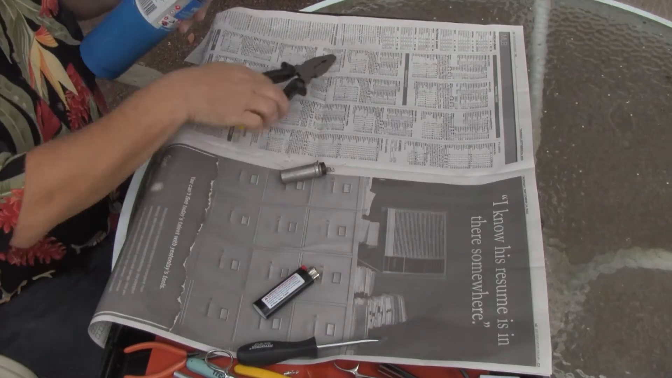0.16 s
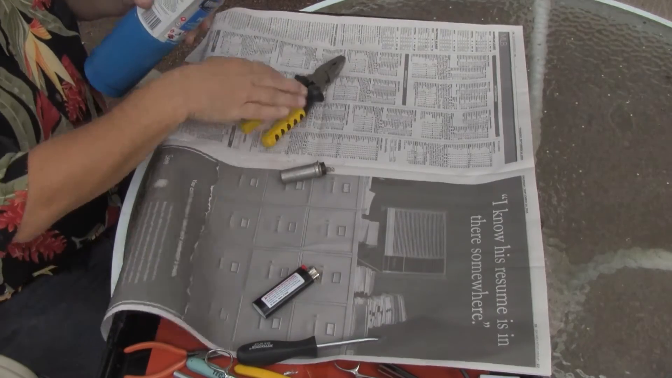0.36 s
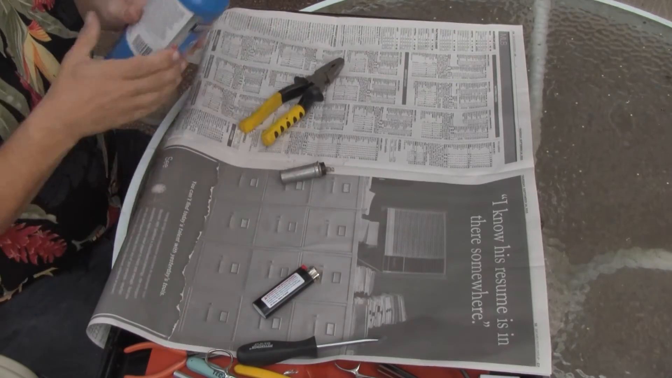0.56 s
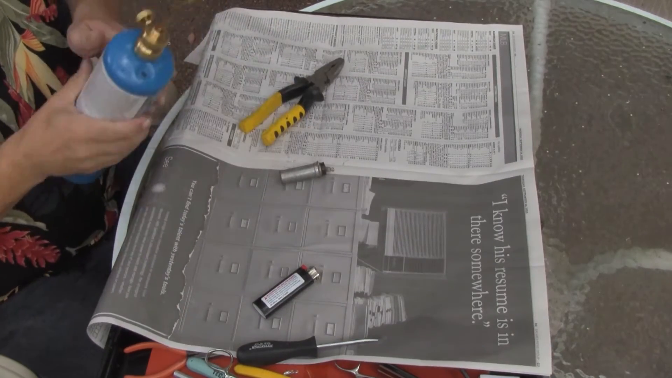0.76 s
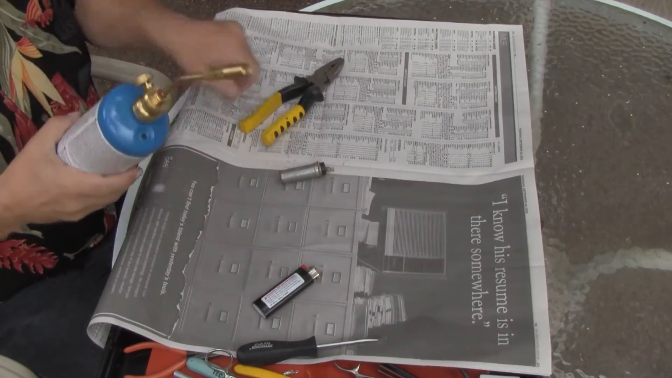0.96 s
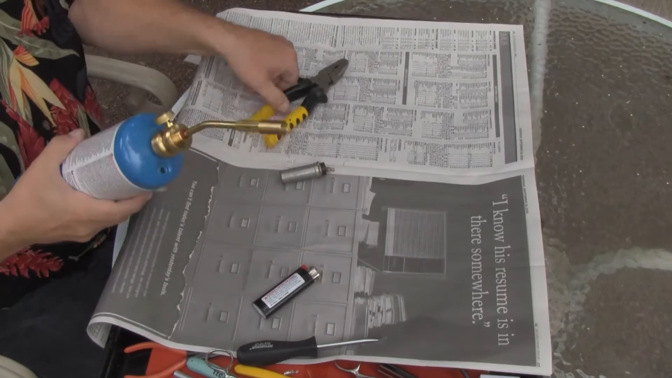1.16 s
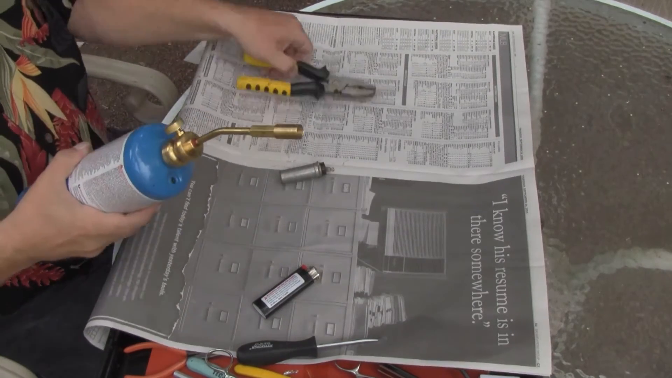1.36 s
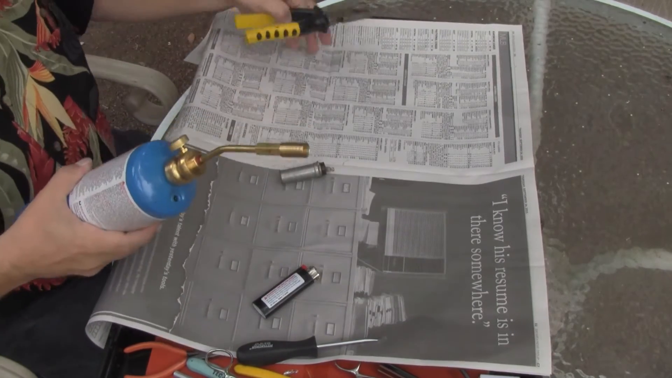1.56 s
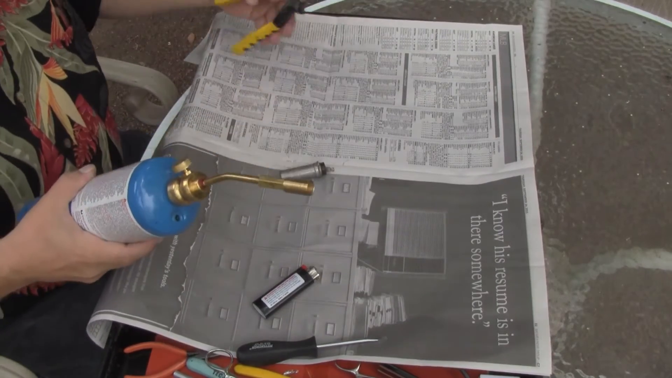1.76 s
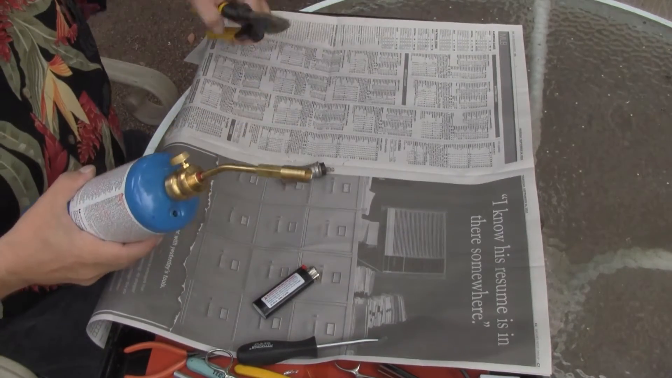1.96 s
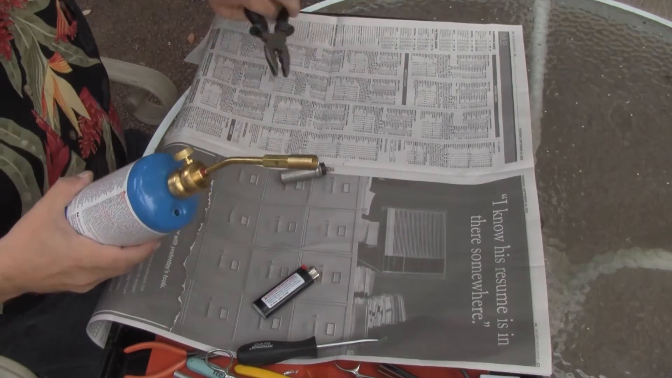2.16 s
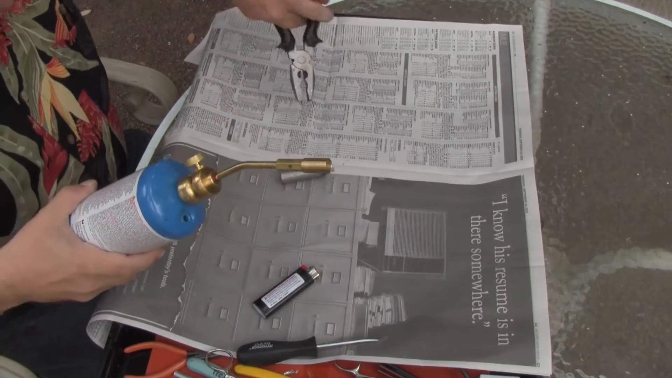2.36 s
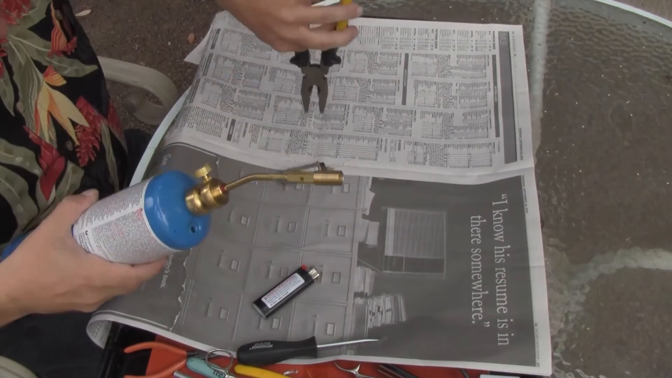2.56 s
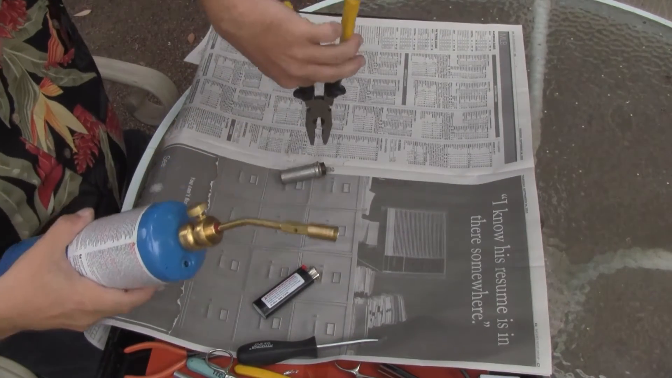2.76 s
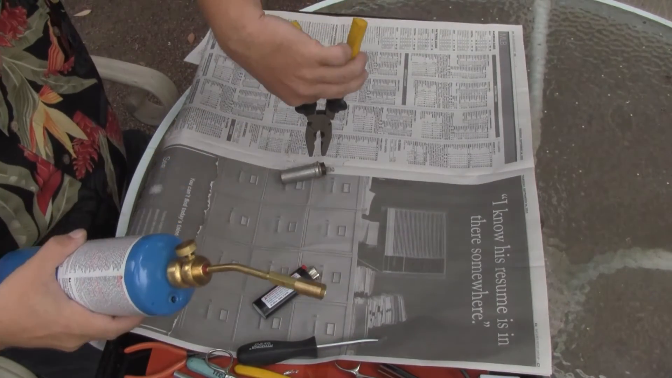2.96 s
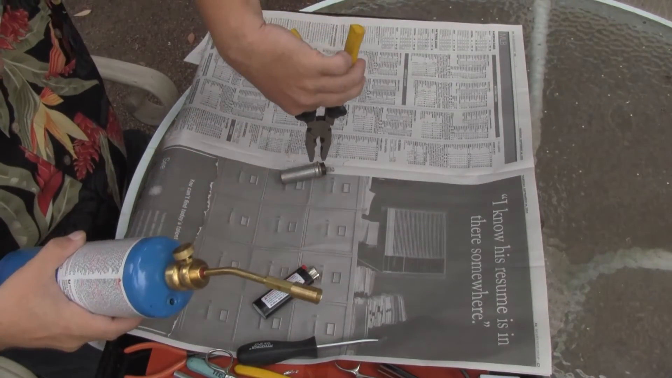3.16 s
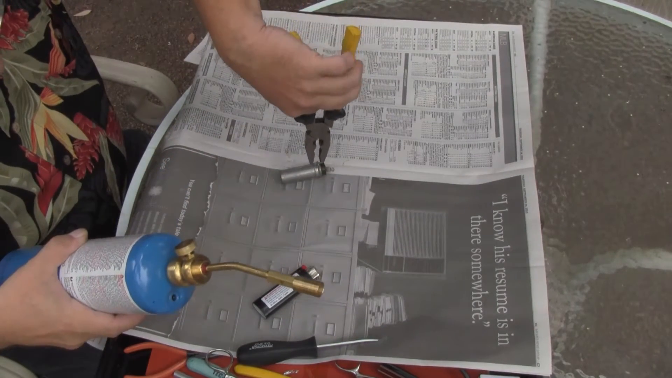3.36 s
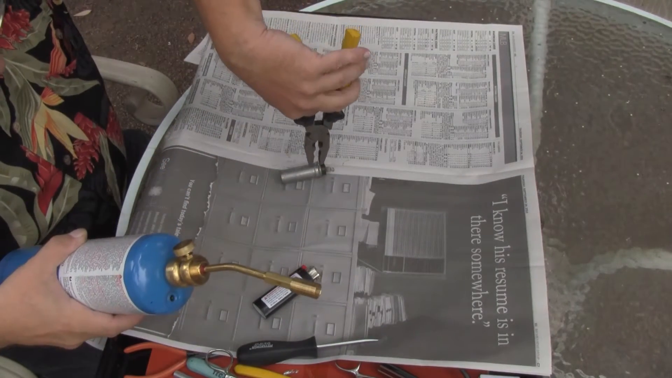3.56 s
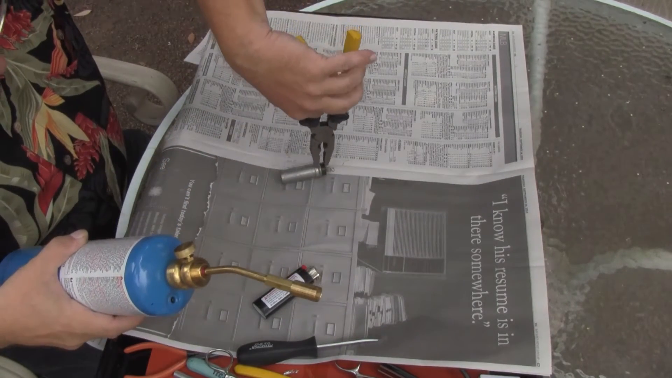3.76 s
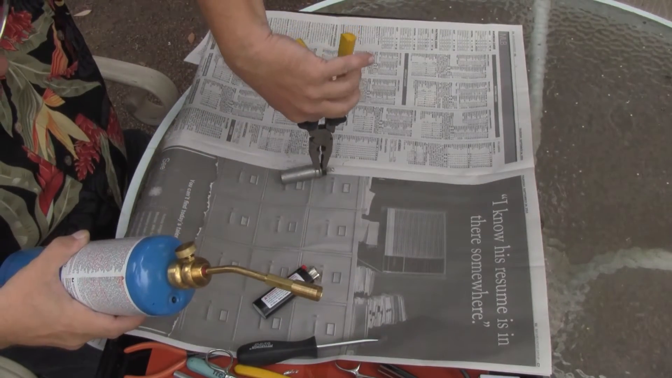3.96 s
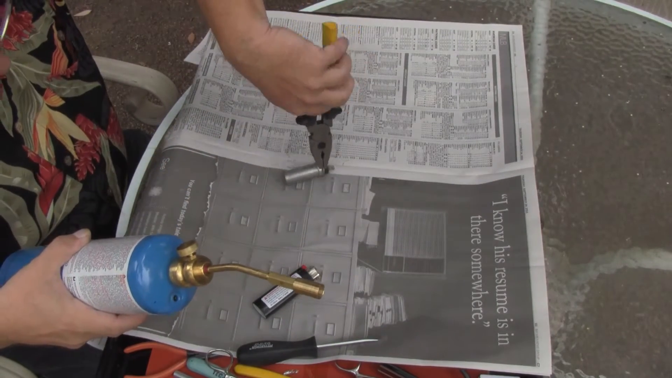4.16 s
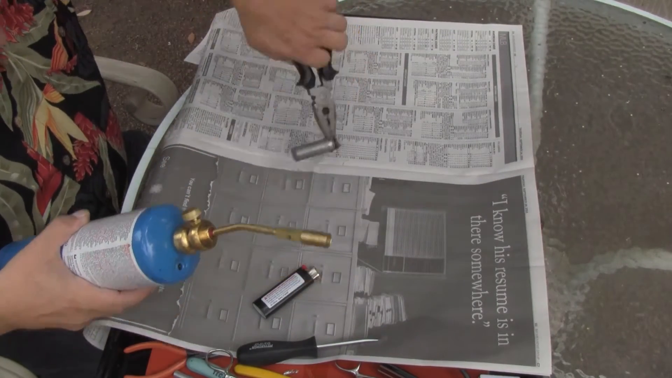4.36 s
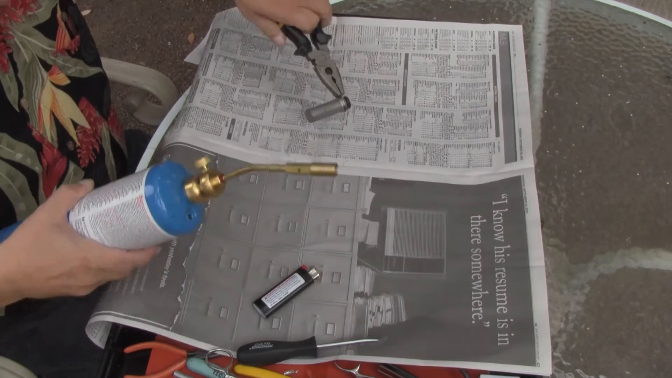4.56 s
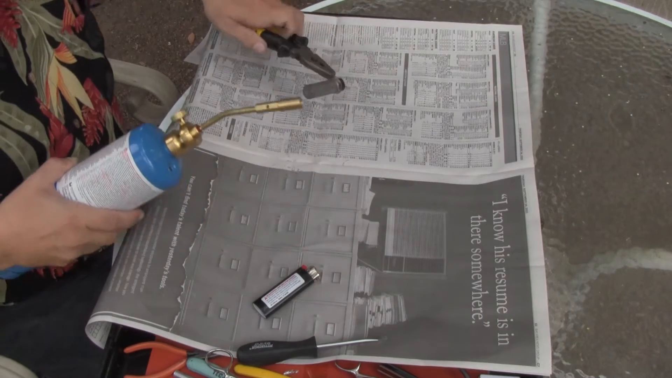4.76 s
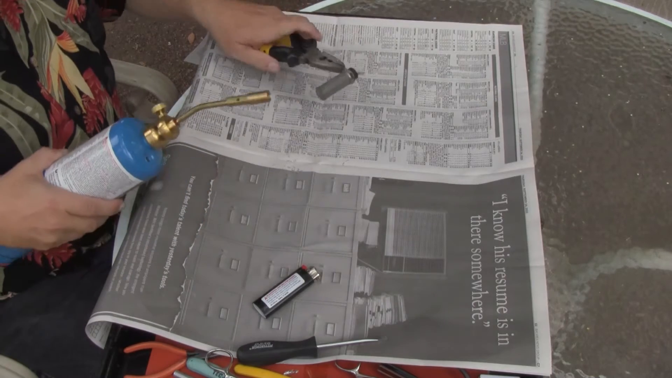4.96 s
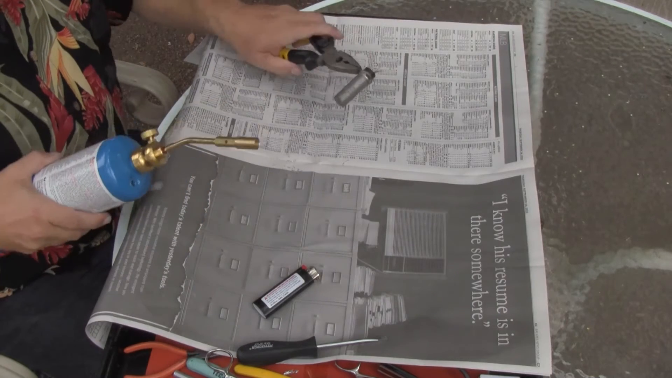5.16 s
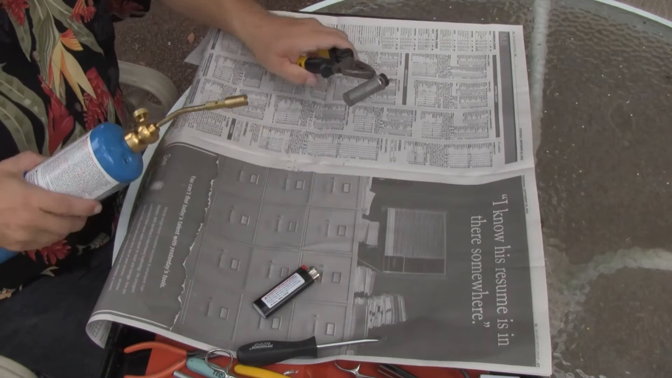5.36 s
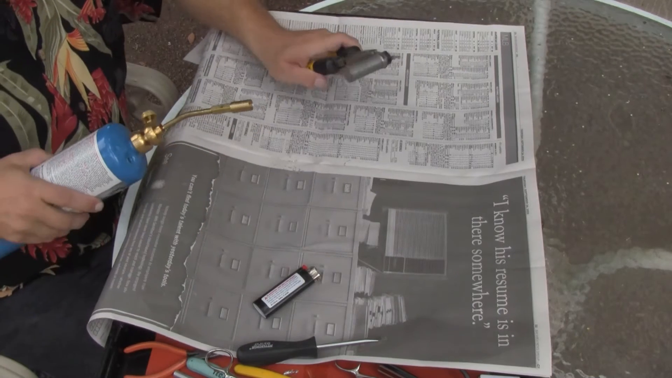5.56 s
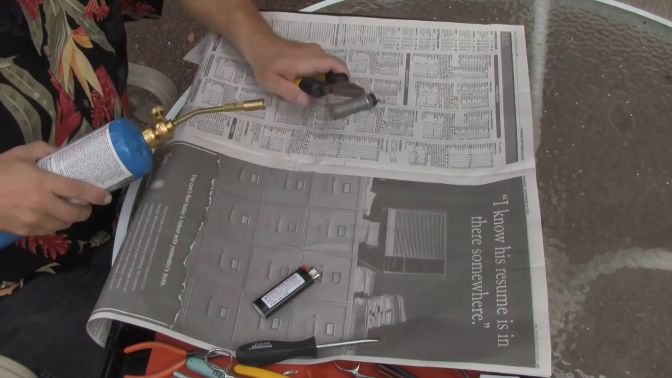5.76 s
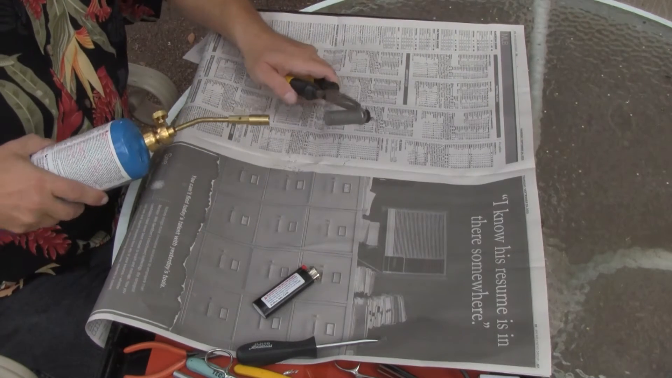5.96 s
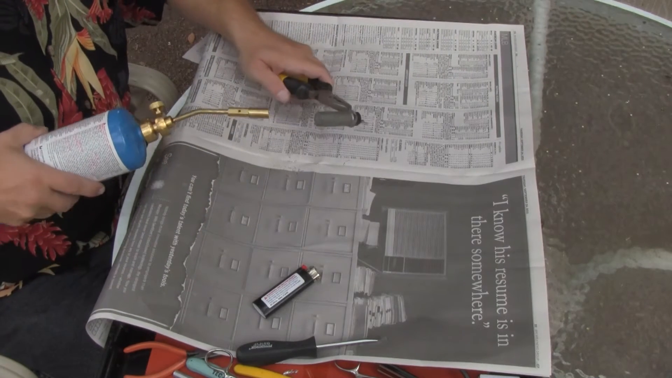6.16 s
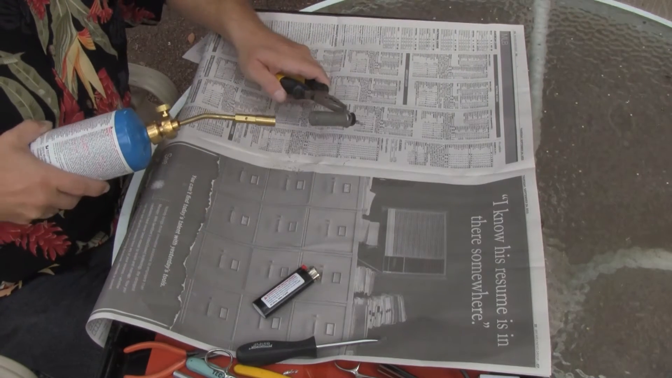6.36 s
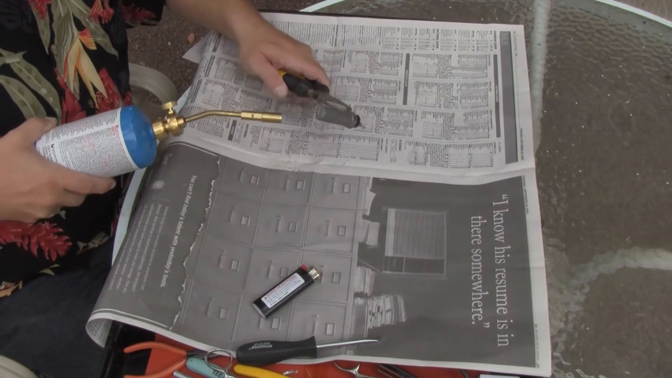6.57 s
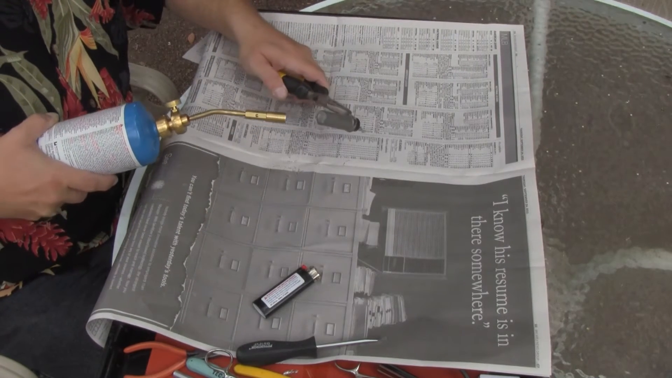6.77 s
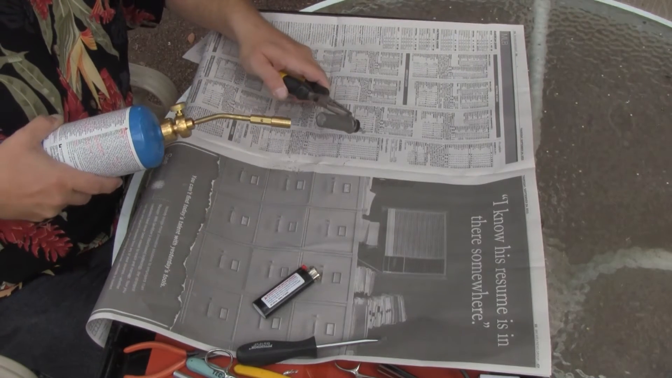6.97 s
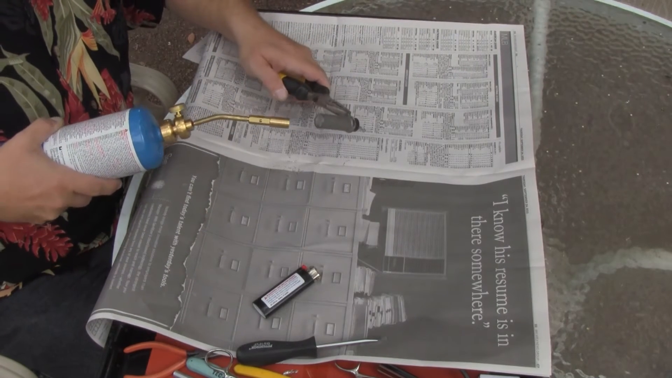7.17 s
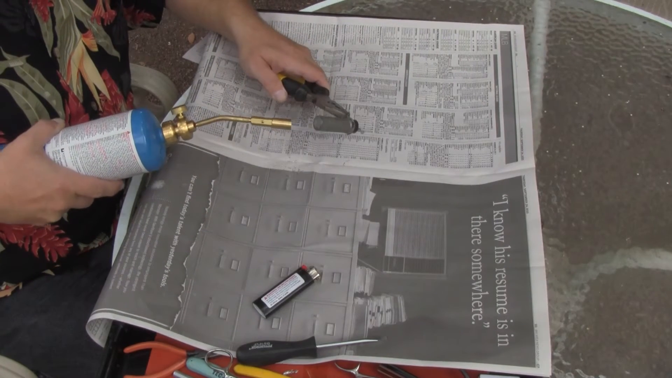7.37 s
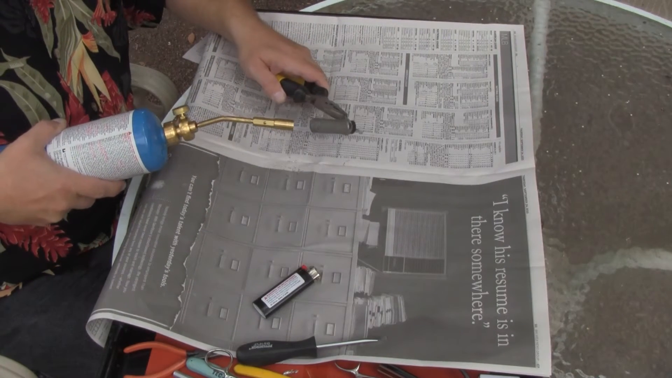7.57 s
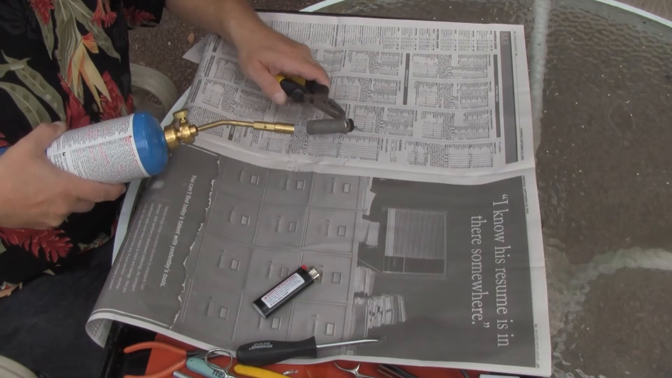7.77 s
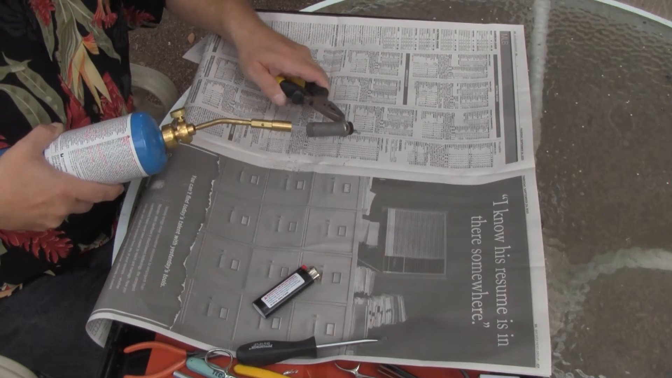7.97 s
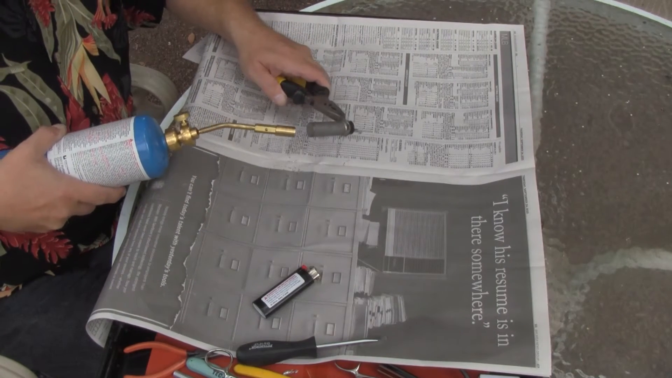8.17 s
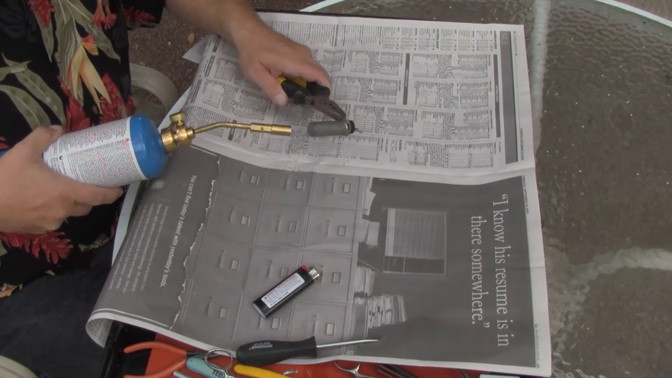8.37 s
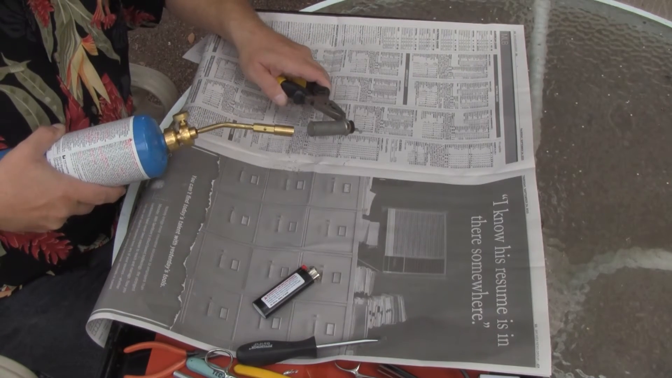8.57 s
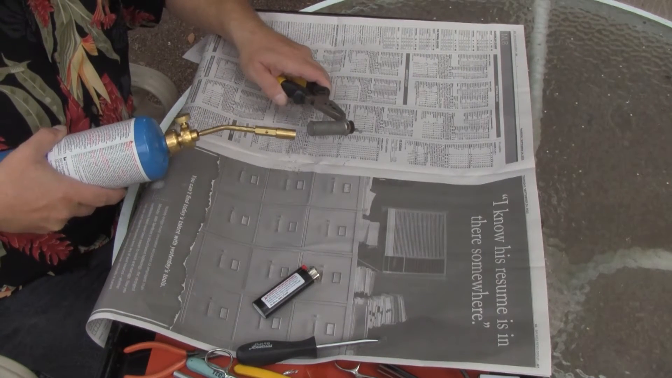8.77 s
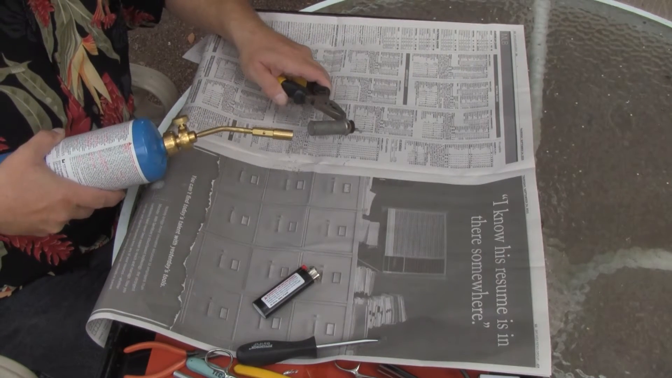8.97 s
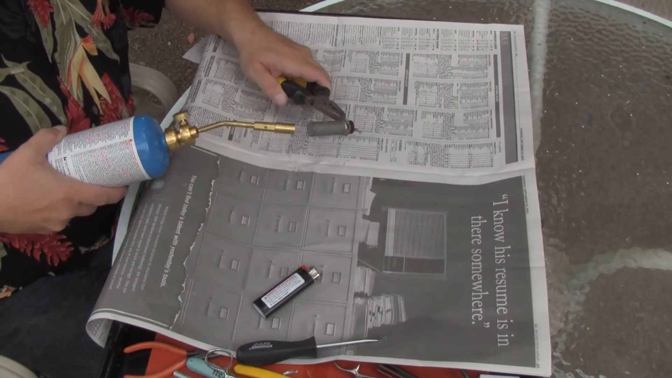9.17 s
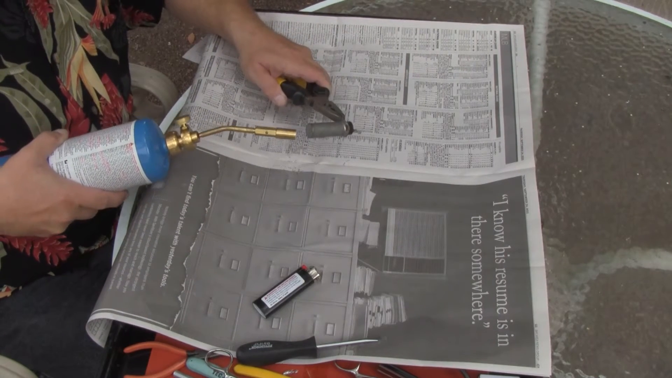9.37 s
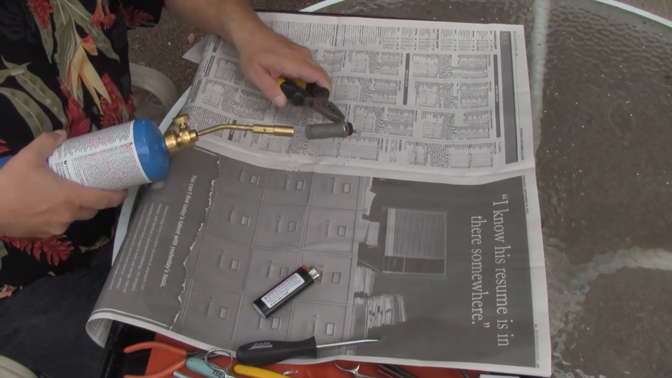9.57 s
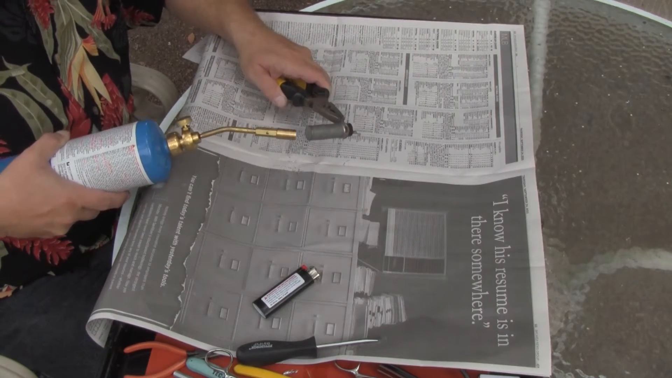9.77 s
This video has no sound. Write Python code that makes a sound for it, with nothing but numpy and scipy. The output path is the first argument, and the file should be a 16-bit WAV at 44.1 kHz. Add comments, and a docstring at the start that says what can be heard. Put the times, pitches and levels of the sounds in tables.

```python
"""A hand-held propane torch burns over a glass patio table covered with newspaper, close to the microphone.
From the start its flame roars and its gas jet hisses, both made of filtered noise.
Pliers soon clatter onto the table and are picked up again: fading sine tones and noise bursts.
As the torch is lowered, a delayed copy off the table combs its sound; light metal ticks come now and then.
Later the flame licks a small metal tube, which adds an unsteady rumble of noise and short flare-ups."""
import sys
import numpy as np
from scipy import signal
from scipy.fft import rfft, irfft, next_fast_len
from scipy.io import wavfile
from scipy.ndimage import uniform_filter1d, map_coordinates

SR = 44100
rng = np.random.default_rng(int(sys.argv[2]) if len(sys.argv) > 2 else 0)


def to_wav(s):
    """Save 16-bit WAV."""
    ch = np.atleast_2d(s).T  # columns
    pcm = np.round(np.clip(ch, -1, 1) * 32767)  # PCM
    wavfile.write(sys.argv[1], SR, pcm.astype(np.int16))


N = 432621  # length of the scene in samples


def undb(db):
    """Turn decibels into a gain."""
    return 10 ** (np.asarray(db) / 20)


def curve(rows):
    """Draw straight lines through (time, value) rows to get a value at every sample."""
    times, values = np.transpose(rows)
    return np.interp(np.arange(N) / SR, times, values)


def ramp(x, length):
    """Rise from 0 to 1 as x goes from 0 to length."""
    return np.clip(x / length, 0, 1)


def fade(t, t60):
    """Die away exponentially, falling 60 dB in t60 seconds."""
    return np.exp(-np.log(1000) * t / t60)


def unit(x):
    """Scale to an rms (average strength) of 1."""
    return x / np.sqrt(np.mean(x ** 2))


def walk(rate):
    """Random wandering of rms 1: about `rate` new values a second, smoothed twice."""
    hold = max(int(SR / rate), 2)
    steps = np.repeat(rng.standard_normal(N // hold + 1), hold)
    smooth = uniform_filter1d(uniform_filter1d(steps, hold), hold)
    return unit(smooth[:N])


def colour(x, points):
    """Filter by a spectrum of (frequency [Hz], level [dB]) points, joined on a log frequency scale."""
    hz, db = np.transpose(points)
    size = next_fast_len(len(x))
    f = np.maximum(np.fft.rfftfreq(size, 1 / SR), 1)
    gain = undb(np.interp(np.log(f), np.log(hz), db))
    return irfft(rfft(x, size) * gain, size)[:len(x)]


def noise(points, size=N):
    """Make coloured noise of rms 1, so the levels in its spectrum are only relative."""
    return unit(colour(rng.standard_normal(size), points))


def lowpass(x, hz, order=2):
    """Take away the treble above hz."""
    sos = signal.butter(order, min(hz, SR / 2 - 1000), fs=SR, output="sos")
    return signal.sosfilt(sos, x)


def delay(x, ms):
    """Play the sound late by a fixed or moving time in milliseconds."""
    return map_coordinates(x, [np.arange(N) - ms * SR / 1000], order=3, mode="mirror")


def shape(x, hz, gain, phase):
    """Filter by a gain and a phase [radians] given at a few frequencies."""
    size = next_fast_len(N)
    f = np.fft.rfftfreq(size, 1 / SR)
    response = np.interp(f, hz, gain) * np.exp(1j * np.interp(f, hz, phase))
    return irfft(rfft(x, size) * response, size)[:N]


def flame(roar_db, flutter_db=.5, grain_db=0.56, lick_flutter_db=2.0, lick_sway_db=0.3):
    """Turbulent burning in the nozzle, and an unsteadier rumble where the flame breaks on the metal."""
    # roar and rumble spectra: (frequency [Hz], relative level [dB])
    roar_spectrum = [(30, -44), (70, -28), (160, -11.5), (230, -6.5), (360, 1.5), (520, 1.5), (750, -0.5),
                     (1050, 3), (1600, -2), (2600, -6.5), (3200, -10), (3800, -17.5), (6000, -25.5),
                     (14000, -63)]
    rumble_spectrum = [(30, -36), (80, -29.5), (160, -1), (300, 6.5), (500, 11), (900, -12), (1500, 6),
                       (2200, 3.5), (3100, -0.5), (3850, -10), (4500, -5), (5400, -21.5), (7000, -23),
                       (15000, -42)]
    # the flame settling on the metal, before the fixed 5.5 dB trim: (time [s], level [dB])
    lick_level = [(5.6, -60), (6.2, -44.5), (7.3, -39), (9.81, -36)]
    roar_db = roar_db + flutter_db * walk(25) + grain_db * walk(400) - 1.54
    rumble_db = curve(lick_level) + lick_sway_db * walk(6) + lick_flutter_db * walk(70) + 5.5
    return noise(roar_spectrum) * undb(roar_db) + noise(rumble_spectrum) * undb(rumble_db)


def jet(hiss_db, whistle_db, flutter_db=0.95, sway_db=0.25):
    """Gas leaving the orifice: a wide hiss and a breathy resonance, swaying with the hand."""
    # hiss spectrum: (frequency [Hz], relative level [dB])
    hiss_spectrum = [(2500, -26), (4300, 3.5), (5000, 0.5), (5950, 7), (6700, 1.5), (8000, 5), (9300, 1),
                     (12300, 4.5), (13800, -0.5), (16000, -7)]
    whistle_hz, filter_width_hz = 11070, 1380
    b, a = signal.iirpeak(whistle_hz, whistle_hz / filter_width_hz, fs=SR)
    breath = signal.lfilter(b, a, rng.standard_normal(N))
    whistle = unit(signal.lfilter(b, a, breath))  # the second pass narrows it further
    gas = noise(hiss_spectrum) * undb(hiss_db + 2.0) + whistle * undb(whistle_db - 3.5)
    return gas * undb(flutter_db * walk(30) + sway_db * walk(6.9))


def torch(arm_ms=1.533, arm_top_hz=6000):
    """Flame and jet arrive directly and off the table; the notches climb and deepen as the nozzle sinks."""
    # roar of the flame, before trim and flare-ups: (time [s], level [dB])
    flame_level = [(0, -28), (.55, -28), (1.15, -24), (4.4, -23.5), (4.85, -26.5), (5.2, -26.5),
                   (5.55, -28), (6.1, -26.5), (7.35, -28), (8.05, -25.5), (9.81, -27)]
    # wide hiss, before trim and flare-ups: (time [s], level [dB])
    gas_level = [(0, -43.5), (1.7, -40), (4.4, -44), (4.68, -47.5), (4.95, -42), (7.6, -41), (9.81, -41.5)]
    # whistle, which comes and goes as the nozzle turns, before trim: (time [s], level [dB])
    whistle_level = [(0, -39), (.7, -45), (.92, -53), (1.3, -33.5), (2.1, -36.5), (2.7, -33.5),
                     (4.4, -34.5), (4.68, -42), (4.85, -36), (5.2, -32), (5.4, -41), (5.75, -40),
                     (5.92, -34.5), (6.35, -35), (6.82, -48.5), (7.4, -36), (8.6, -38), (9.81, -38.5)]
    # height of the torch, as the lag of its reflection off the table: (time [s], lag [ms])
    height = [(0.0, 1.055), (0.28, 1.151), (0.72, 1.463), (0.95, 1.507), (1.2, 1.355), (1.85, 1.375),
              (2.1, 1.474), (2.45, 1.339), (3.0, 1.228), (4.2, 1.171), (4.53, 1.254), (4.85, 0.851),
              (5.2, 0.746), (5.65, 0.705), (5.95, 0.46), (6.72, 0.481), (6.9, 0.41), (9.81, 0.375)]
    # the nozzle turns toward the microphone: (start [s], end [s], aim [0-1])
    aims = [(.9, 3.4, 0.6), (2.4, 4.55, 0.99), (6.8, 10.2, 0.52)]
    # flare-ups where the flame catches an edge of the tube: (time [s], rise [dB])
    flares = [(7.85, 2), (9.39, 2), (9.71, 2.5)]
    # how glass and newspaper return the flame's sound: (frequency [Hz], share, phase lead [radians])
    paper = [(200, .85, 0), (500, .65, .1), (780, .72, .25), (1080, .9, .15), (1400, .85, .6),
             (1700, .62, .2), (2100, .78, -.2), (2700, .62, -.3), (3300, .66, 0), (4200, .65, 0)]
    turn_in_s, turn_out_s = 0.68, 0.29
    flare_s = .06  # half width of a flare-up
    tremor_ms = .005  # the unsteady hand makes the lag wander
    t = np.arange(N) / SR
    lag = curve(height) + tremor_ms * walk(4)
    turns = [share * ramp(t - start, turn_in_s) * ramp(end - t, turn_out_s) for start, end, share in aims]
    aim = np.max(turns, axis=0)
    flare_db = sum(db * np.exp(-((t - s) / flare_s) ** 2) for s, db in flares)

    burn = flame(curve(flame_level)) * undb(flare_db)
    gas = jet(curve(gas_level) + flare_db, curve(whistle_level))
    # the nozzle's bright beam is too narrow to meet the table
    beam_noise = noise([(5000, -20), (8500, -7.0), (10000, -2.5), (12000, -3.5), (16000, -17)])
    full_beam_db = -35  # when aimed straight at the microphone
    beam = beam_noise * undb(full_beam_db) * aim ** 2

    direct_ms = 4  # travel time straight to the microphone
    spreading = direct_ms / (direct_ms + lag)  # the longer path arrives weaker
    jet_share, aim_loss = .52, .8  # share of the jet meeting the table, and the part of it that aiming loses
    bounce = jet_share * (1 - aim_loss * aim)
    jet_path = .97  # the orifice sits lower than the flame: its lag as a share of the flame's
    flame_bounce = delay(shape(burn, *np.transpose(paper)), lag)
    table = flame_bounce + bounce * delay(gas, lag * jet_path)

    # the hand and arm reflect too once the lag sinks below this reach, fully one span lower
    arm_reach_ms, arm_span_ms, arm_share = 0.64, 0.16, 0.35
    near_arm = ramp(arm_reach_ms - lag, arm_span_ms)
    # skin and cloth swallow the top; filtering forward then backward adds no delay
    backward = lowpass(burn + gas, arm_top_hz)[::-1]
    dull = lowpass(backward, arm_top_hz)[::-1]
    arm = arm_share * near_arm * delay(dull, arm_ms)
    return burn + gas + beam + spreading * table + arm


def chatter(count=7):
    """Loose jaws make unevenly spaced blows, ever weaker and duller, that ring the glass moderately."""
    start_s, length_s = .34, .09
    first_db, fall_db, glass_db = -7.5, 9, -4
    first_hz, last_hz = 7000, 4000
    progress = (np.arange(count) + rng.random(count)) / count
    bright_hz = first_hz + (last_hz - first_hz) * progress
    return [(start_s + length_s * p, first_db - fall_db * p, hz, glass_db)
            for p, hz in zip(progress, bright_hz)]


def pliers(ring_db=-21, knock_db=-2, knock_top_hz=1400, knock_cycles=9, crack_db=-6, crack_t60=0.015,
           rattle_db=-11, rattle_t60=0.19, scatter_db=4.5, scatter_hz=900):
    """Jaws and handles land one after another; each blow knocks, rattles and rings the glass top."""
    # pliers striking the padded table; a soft contact has a low brightness:
    # (time [s], level [dB], brightness [Hz], extra ring of the glass [dB])
    blows = [(0.3345, -6, 1910, 2.5), (.3448, -11, 14000, -5), (0.352, -16, 6000, -4),
             (0.382, -11, 1820, -7), (0.3873, -5, 3200, -3), (.4003, -12.5, 8000, -4),
             (0.4048, -8.5, 2200, -4), (.436, -10.5, 1310, -1.5), (1.336, -19.5, 290, 4)]
    # modes (natural tones) of the glass top, the last two of the pliers:
    # (frequency [Hz], relative level [dB], time to fall 60 dB [s])
    modes = [(98, -23, 0.7), (128.5, -17.5, 1), (185, -2.5, 0.55), (289, -8, 0.46), (361.6, -2, 0.46),
             (398, -5, 0.23), (663, -24, .15), (710, -14, 0.23), (790, -25, .15), (900, -16, 0.18),
             (1081, -5, 0.19), (1088, -2.5, 0.23), (1275, 0.5, 0.28), (1327, -4, .2), (1500, -1, 0.15),
             (2770, -6, .12), (7660, 3, .1)]
    # clack spectrum: (frequency [Hz], relative level [dB])
    clack_spectrum = [(40, -52), (80, -26), (140, -22), (400, -4), (850, 4.5), (1500, -1.5), (2800, -5),
                      (4200, -16), (8000, -12.5), (12000, -12), (16000, -26)]
    out, t = np.zeros(N), np.arange(SR) / SR
    # each spot favours other high modes
    spot_db = scatter_db * ramp(np.array(modes)[:, 0], scatter_hz)
    for s, db, bright_hz, glass_db in blows + chatter():
        spot = undb(spot_db * rng.standard_normal(len(modes)))
        ring = sum(g * undb(mode_db) * np.sin(2 * np.pi * hz * t) * fade(t, t60)
                   for g, (hz, mode_db, t60) in zip(spot, modes))
        knock_hz = 1 / (1 / knock_top_hz + 1 / bright_hz)  # a softer contact knocks lower and longer
        knock = undb(knock_db) * np.sin(2 * np.pi * knock_hz * t) * fade(t, knock_cycles / knock_hz)
        push = 1000 / knock_hz  # a longer push hands the glass more momentum
        clack_fade = undb(crack_db) * fade(t, crack_t60) + undb(rattle_db) * fade(t, rattle_t60)
        clack = noise(clack_spectrum, size=SR) * clack_fade
        blow = knock + clack + push * undb(ring_db + glass_db) * ring
        i = int(s * SR)
        out[i:i + SR] += undb(db) * lowpass(blow, bright_hz)
    # the open table top radiates almost no deep bass
    return signal.sosfilt(signal.butter(4, 105, "high", fs=SR, output="sos"), out)


def ticks(t60=0.018):
    """The tools and the tube touch with short bright bursts of noise."""
    # light ticks of metal: (time [s], level [dB])
    touches = [(1.344, -21), (4.539, -28), (5.493, -35), (5.6246, -18.5), (6.244, -32)]
    spectrum = [(300, -34), (900, 9), (2500, 7), (4500, -1), (9000, -4), (15000, -9)]
    out, t = np.zeros(N), np.arange(SR // 10) / SR
    for s, db in touches:
        i = int(s * SR)
        out[i:i + len(t)] += undb(db) * fade(t, t60) * noise(spectrum, size=len(t))
    return out


def patio(x, scatter_db=-21, bass_db=6, treble_db=11, t60=0.056):
    """Chairs, paving and wall scatter a short faint tail, different on each side."""
    t = np.arange(SR // 3) / SR
    tails = rng.standard_normal((2, len(t))) * fade(t, t60) * (t > .002)
    tails /= np.sqrt(np.sum(tails ** 2, axis=1, keepdims=True))
    # the beamed treble mostly misses the microphone, so the scattered sound has more of it
    aside = colour(x, [(200, bass_db), (600, 0), (4000, 0), (13000, treble_db)])
    scattered = np.array([signal.fftconvolve(aside, tail)[:N] for tail in tails])
    return x + undb(scatter_db) * scattered


def scene():
    """Torch and tools on the table, heard by two close ports, mostly a little stronger on the right."""
    # left minus right: (frequency [Hz], level difference [dB])
    sides = [(60, -6), (120, 2), (200, -2), (380, -5), (700, -5), (1290, -3), (2400, -1.5), (4400, -0.5),
             (9000, -3), (14000, -1)]
    # phase by which the left port leads: (frequency [Hz], phase [radians])
    ports = [(100, -0.05), (260, -0.5), (780, 0.05), (6000, 0), (9200, 0.03), (13800, 0.9), (15600, .1)]
    sound = patio(torch() + pliers() + ticks())
    size = next_fast_len(N)
    f = np.fft.rfftfreq(size, 1 / SR)
    # each side takes half of the difference, in opposite directions
    half_gain = undb(np.interp(f, *np.transpose(sides)) / 2)
    half = half_gain * np.exp(.5j * np.interp(f, *np.transpose(ports)))
    return irfft(rfft(sound, size) * np.array([half, 1 / half]), size)[:, :N]


def record(dry):
    """The recorder rounds the loudest peaks and cuts the top."""
    top_hz = 15780
    cut = signal.ellip(10, .1, 80, top_hz, fs=SR, output="sos")
    return signal.sosfilt(cut, np.tanh(dry))


dry = scene()
out = record(dry)
to_wav(out)
```